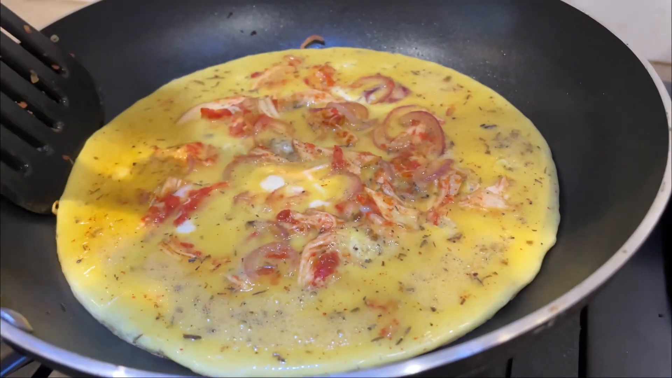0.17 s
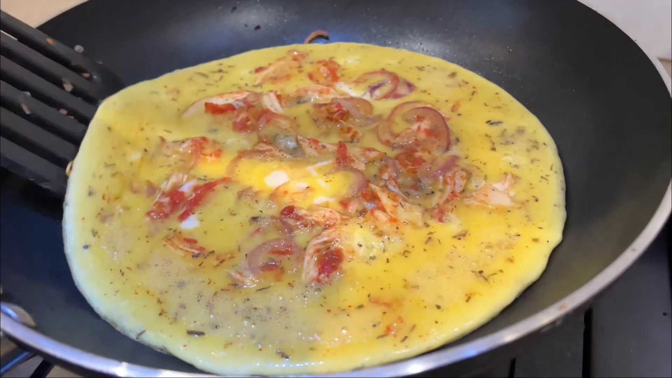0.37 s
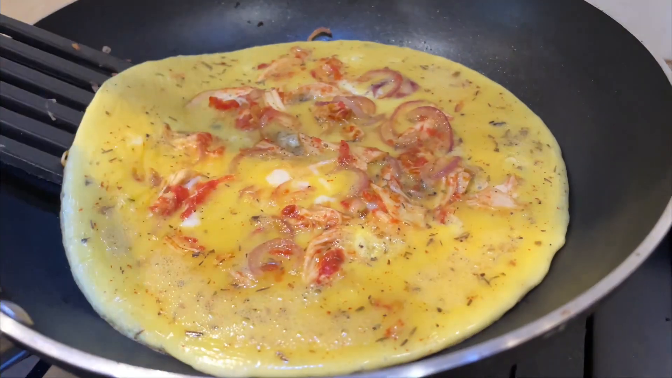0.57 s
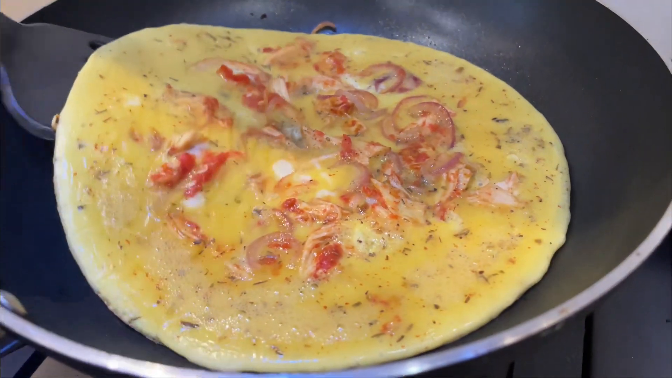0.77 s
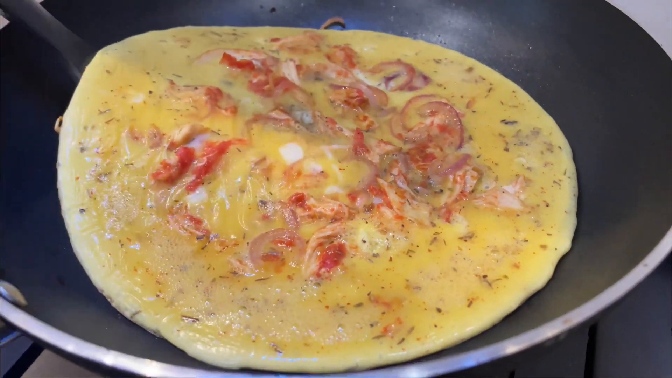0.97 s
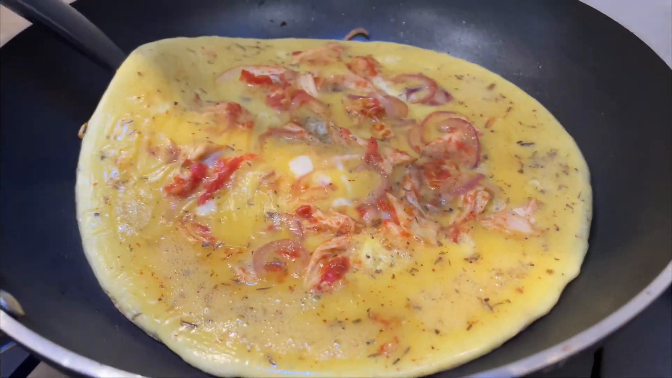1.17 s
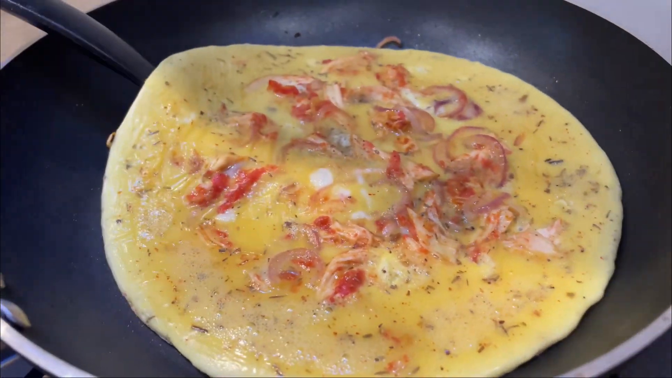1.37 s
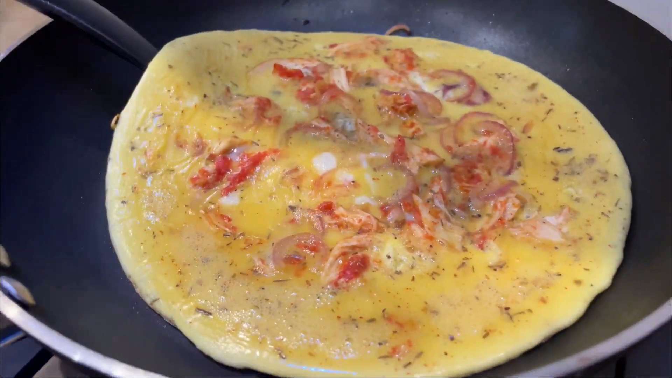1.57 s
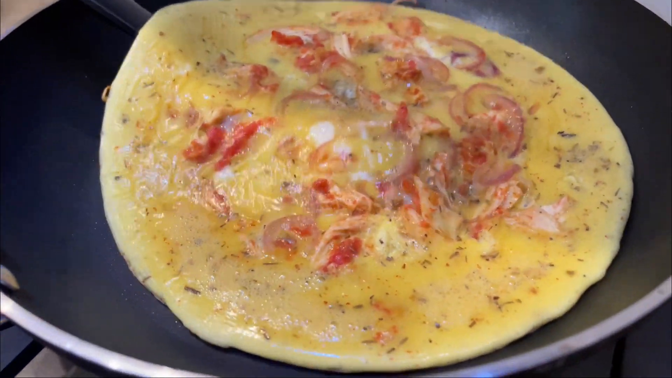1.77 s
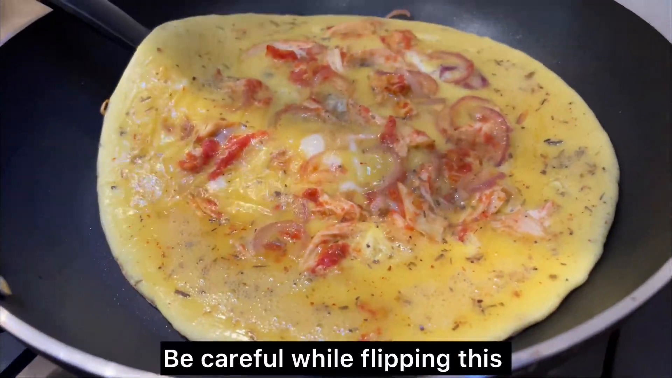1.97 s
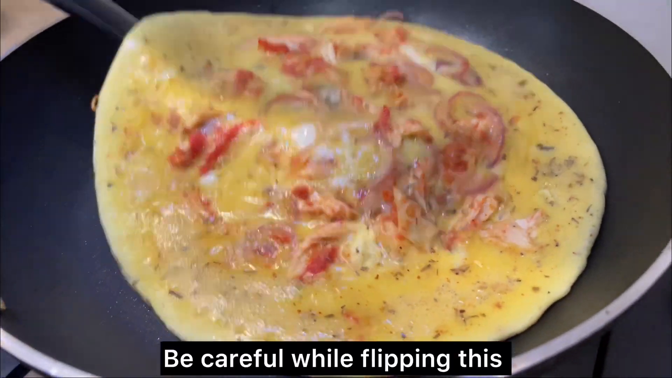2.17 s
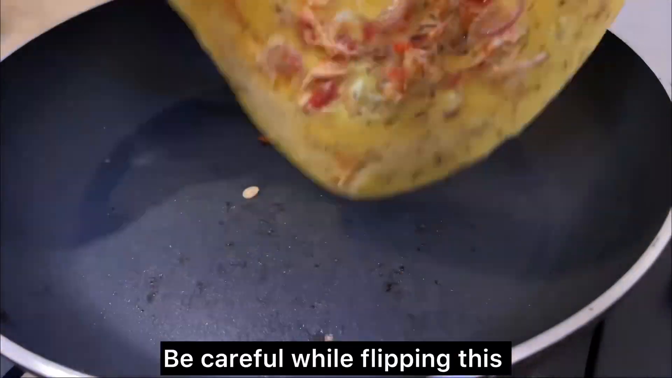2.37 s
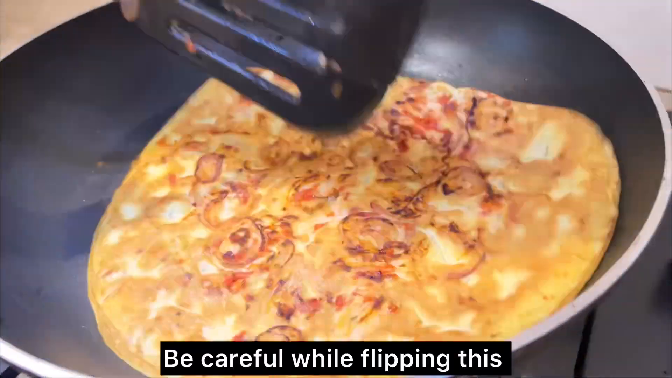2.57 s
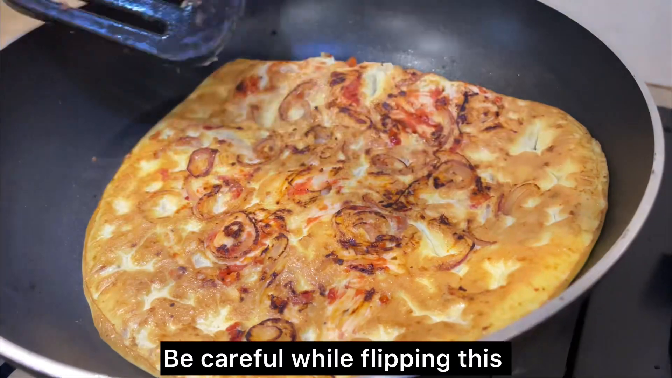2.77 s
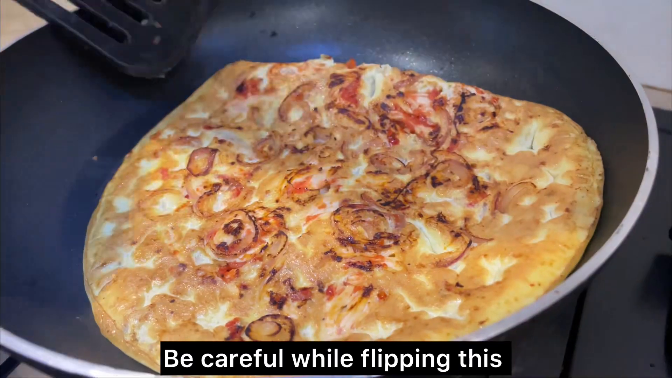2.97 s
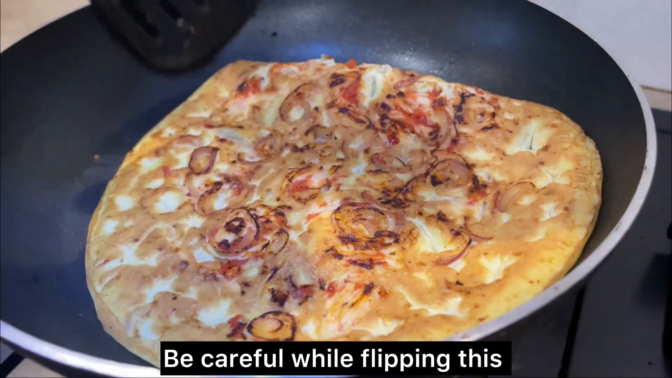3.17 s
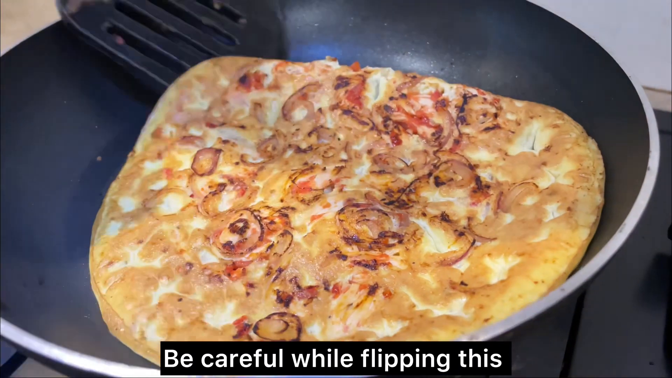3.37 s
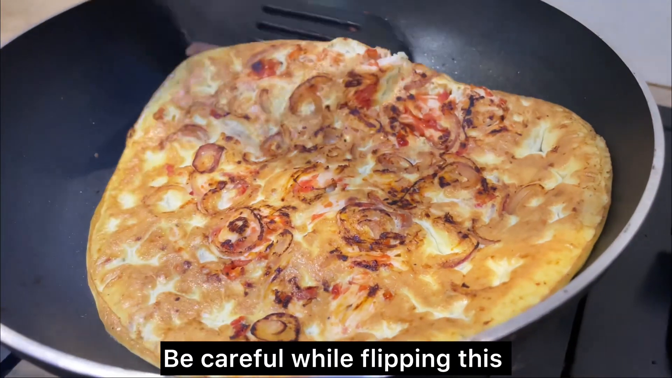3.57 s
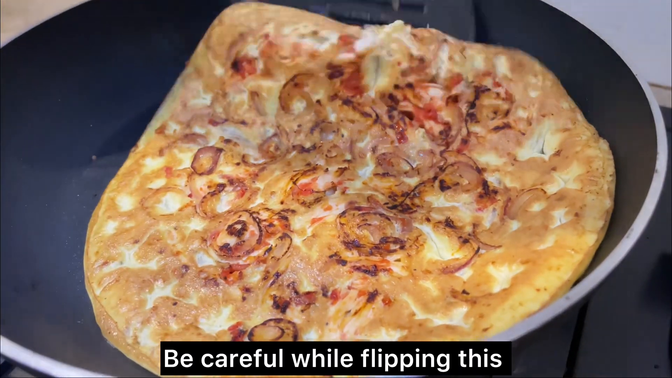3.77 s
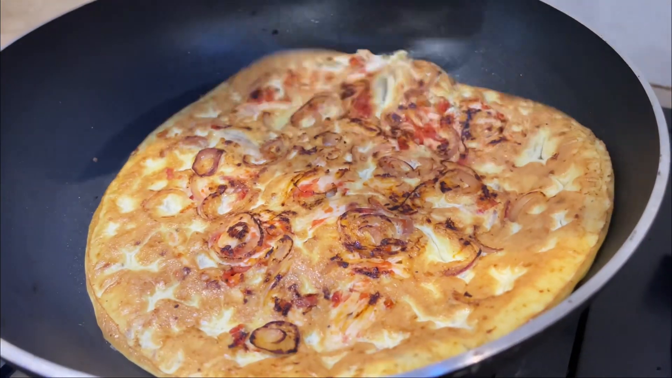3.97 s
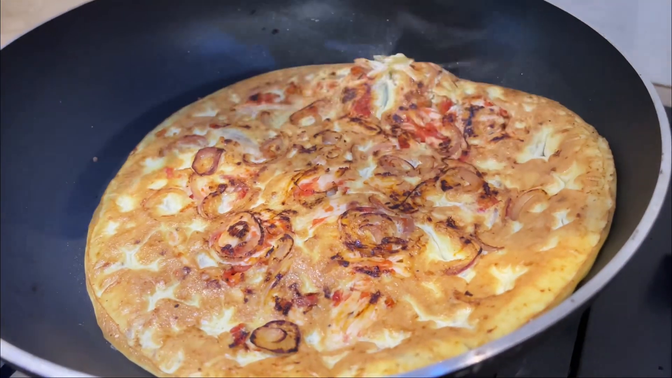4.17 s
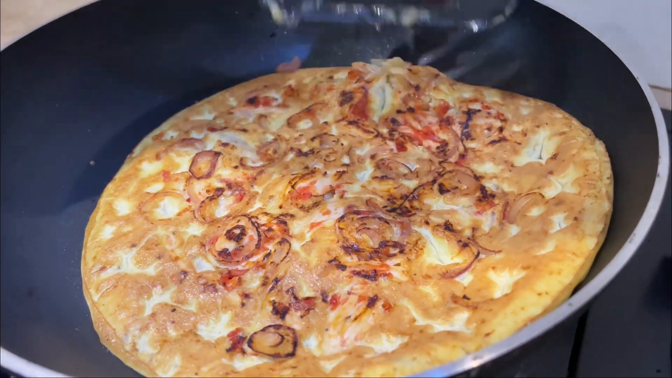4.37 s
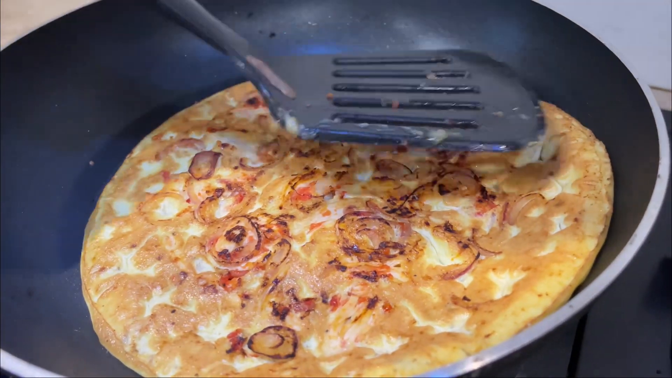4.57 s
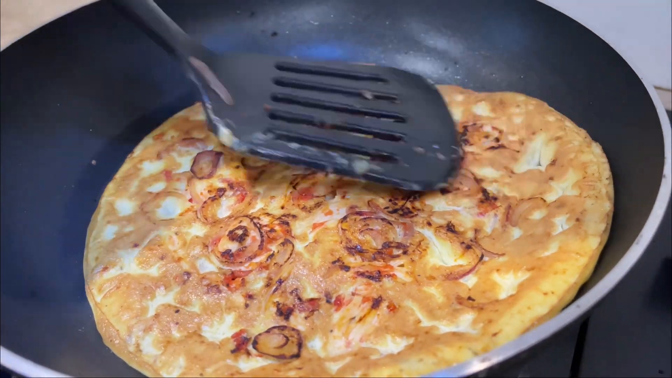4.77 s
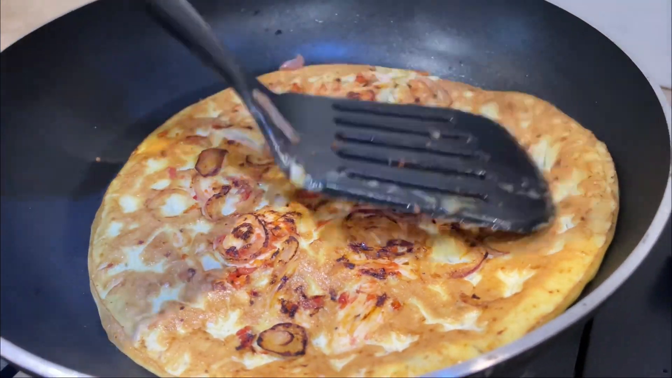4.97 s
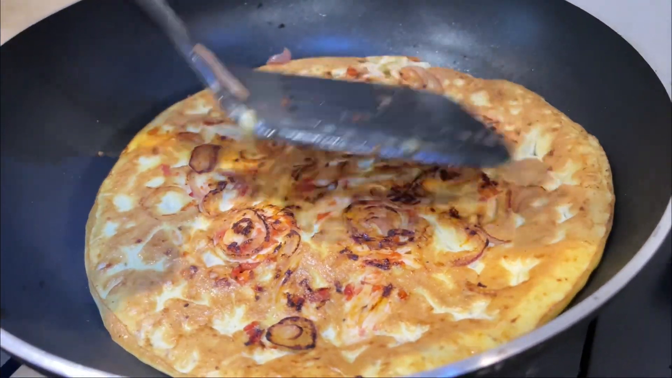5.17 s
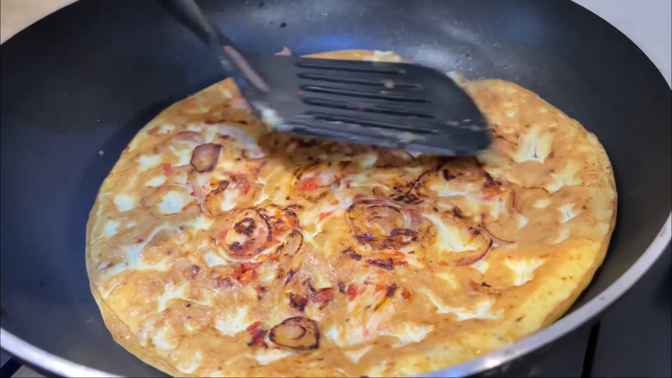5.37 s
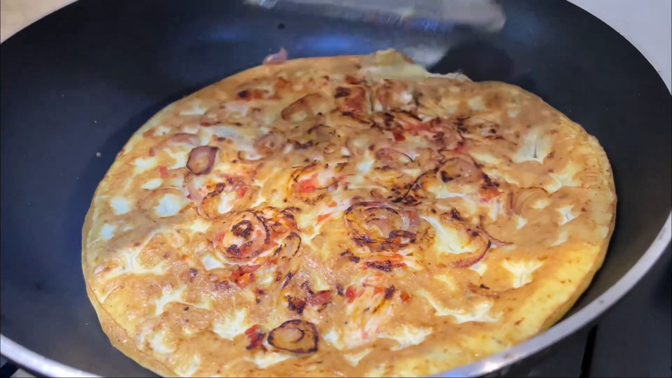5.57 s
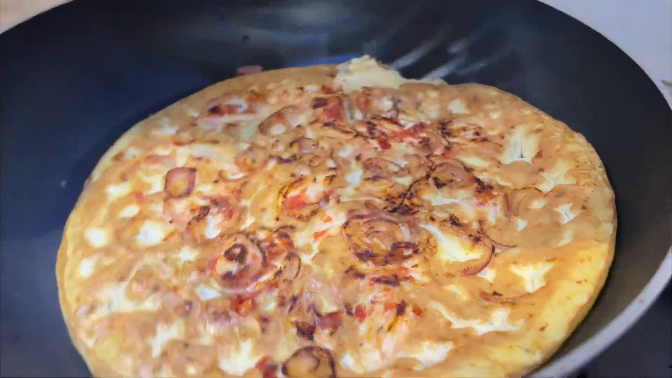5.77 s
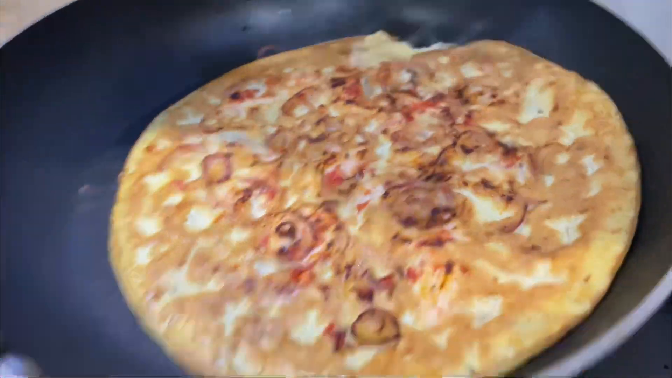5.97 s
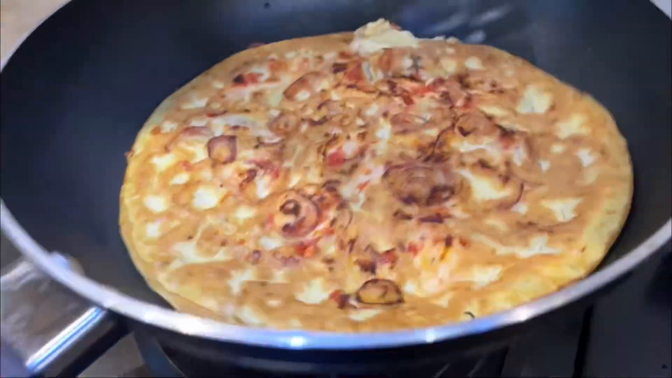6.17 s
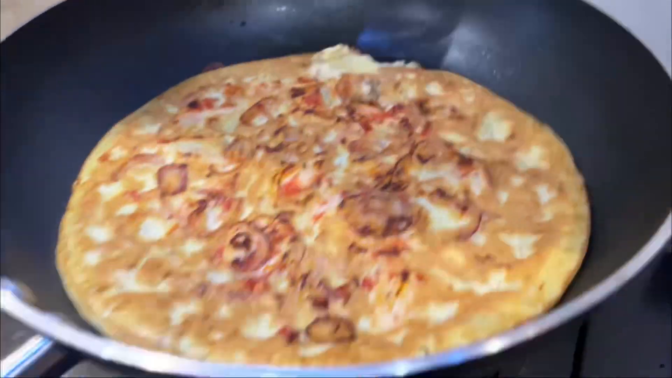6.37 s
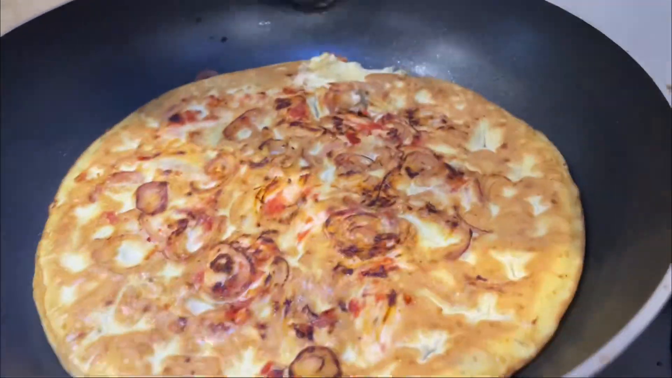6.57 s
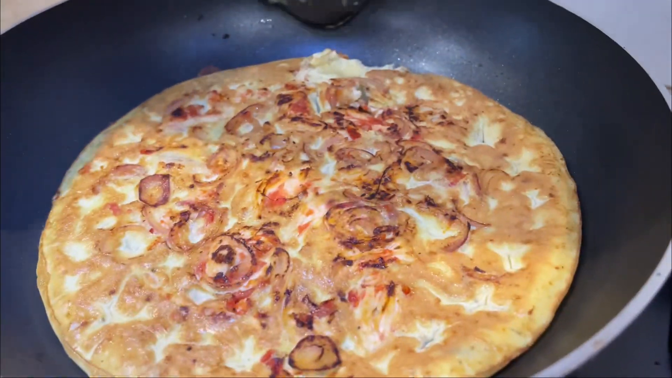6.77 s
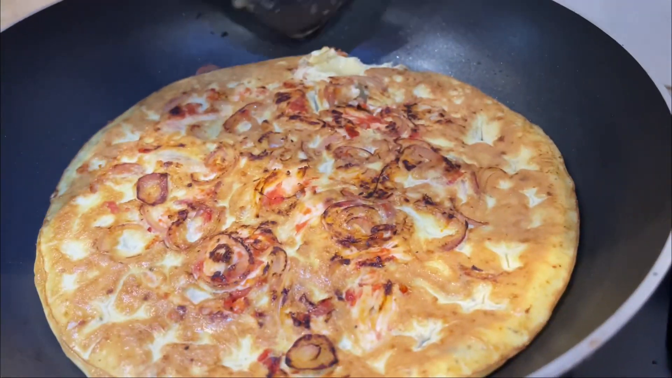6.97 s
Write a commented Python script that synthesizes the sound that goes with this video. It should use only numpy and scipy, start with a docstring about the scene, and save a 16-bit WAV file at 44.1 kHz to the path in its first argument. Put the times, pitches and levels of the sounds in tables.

```python
"""An omelette sizzles in a nonstick pan: countless random pops, filtered into dry hiss and wet bubbling.
It is lifted with a plastic spatula that rubs and ticks, flipped with a wet slap of noise and patted down.
The pan rings as it knocks on the iron grate; twice it is shaken across it, so that the hob top booms.
Fat spits in short bursts of noise and the gas burner rumbles as filtered noise, in a small kitchen.
A pair of microphone ports hears it all from close by."""
import sys
import numpy as np
from scipy import signal
from scipy.fft import rfft, irfft, next_fast_len
from scipy.io import wavfile

SR = 44100
rng = np.random.default_rng(int(sys.argv[2]) if len(sys.argv) > 2 else 0)


def output_pcm(signal):
    """Save a mono or channel-first signal as 16-bit PCM at the path in sys.argv[1].

    Samples are clipped to [-1, 1] before scaling.
    """
    pcm = np.clip(np.atleast_2d(signal).T, -1, 1) * 32767
    wavfile.write(sys.argv[1], SR, np.round(pcm).astype(np.int16))


N = 309582
SIZE = next_fast_len(N + SR // 2)  # room for filter tails
HZ = np.maximum(np.arange(SIZE // 2 + 1) * SR / SIZE, 1)
TIME = np.arange(N) / SR  # seconds
SEAR_RISE_S = 0.016

# Levels in all tables are relative: each source may trim them further.
# the pan knocks on the iron grate: start_s, clank_db, grate_rattle_db, hob_boom_db, brightness_hz
KNOCKS = [(2.579, -37, -32, -16, 2000), (5.8, -10, -12, -26, 1810), (5.823, -6, -15, -18, 1900),
          (5.833, -11, -19, -20, 2010), (5.871, -16, -11, -23, 1500), (5.9004, -5.5, -7.5, -33, 3030),
          (6.006, -22, -13, -33, 2600), (6.031, -38, -18, -40, 1500), (6.067, -23, -17.5, -48, 1500),
          (6.121, -24.5, -17.5, -49, 1500), (6.2436, 0.5, -4.5, -14.5, 3080),
          (6.259, -22, -14, -16.5, 3000), (6.297, -19, -16, -23, 1800), (6.320, -7.5, -13.5, -17, 2950),
          (6.346, -13, -32, -38, 2300), (6.374, -8, -8.5, -19, 3280), (6.45, -22, -17.5, -36, 3000),
          (6.4655, -4, -13, -22, 2400), (6.476, -8, -17, -36, 2200), (6.51, -24, -19, -29, 1500),
          (6.572, -13.5, -10.5, -29, 1200), (6.602, -18, -25, -30, 1200), (6.639, -32, -24, -35, 1200)]
# the plastic spatula knocks in the pan: start_s, tick_db, hollow_knock_db, hob_boom_db
TAPS = [(0.898, -32, -22.5, -40), (2.553, -5.5, -14, -36), (2.8241, -20.5, -17.5, -20.5),
        (2.911, -26, -22, -27.5), (2.973, -32, -18, -25.5), (3.069, -40, -25, -42),
        (3.1205, -11, -12.5, -27), (3.218, -9.5, -12.5, -30), (3.402, -20, -14, -31),
        (3.489, -20, -18, -37)]
# ringing of the spatula's blade: pitch_hz, width_hz, level_db
BLADE = [(352, 11.5, 3.5), (540, 61, 2), (755, 49, -3.5), (914, 33, -11.5), (1150, 270, -14),
         (1600, 180, -20), (1633, 14, -28), (2290, 43, -1.5)]
# egg pressed suddenly on hot metal: start_s, hiss_db, wet_bubbling_db
SEARS = [(2.569, -41, -29.5), (4.72, -47, -62), (6.246, -48, -24)]


def from_db(db):
    """Decibels to gain."""
    return 10 ** (np.asarray(db) / 20)


def rms_one(x):
    """Scale to unit power."""
    return x / np.sqrt(np.mean(x ** 2) + 1e-20)


def in_time(rows):
    """Each column of a curve at every sample."""
    s, *columns = np.transpose(rows)
    return [np.interp(TIME, s, column) for column in columns]


def over_hz(points):
    """A table joined by straight lines on a log-frequency axis."""
    hz, value = np.transpose(points)
    return np.interp(np.log(HZ), np.log(hz), value)


def colour(x, spectrum):
    """Filter to this spectrum without sounding ahead of time (minimum phase); white noise keeps its power."""
    gain = rms_one(from_db(over_hz(spectrum)))
    cepstrum = irfft(np.log(gain), SIZE)
    # folding the second half onto the first makes the filter act only forwards in time
    cepstrum[1:SIZE // 2] *= 2
    cepstrum[SIZE // 2 + 1:] = 0
    response = np.exp(rfft(cepstrum))
    return irfft(rfft(x, SIZE) * response, SIZE)[..., :N]


def cut(x, hz, kind, order):
    """Butterworth low- or high-pass filter."""
    sections = signal.butter(order, min(hz, SR / 2 - 100), kind, fs=SR, output="sos")
    return signal.sosfilt(sections, x + 1e-18)


def noise():
    """White noise: one row common to both ports, one row that differs between them."""
    return rng.standard_normal((2, N))


def drift(rate):
    """Slow random wandering: this many new random values a second, of spread 1, joined by lines."""
    return np.interp(TIME * rate, np.arange(2000), rng.standard_normal(2000))


def grains(per_s, spread_db):
    """Random clicks of unit power; positive spread makes a few much larger, negative a few much smaller."""
    born = rng.random(N) < per_s / SR
    sizes = from_db(spread_db * np.minimum(rng.exponential(1, N), 5))
    return rms_one(born * sizes * noise())


def resonate(x, modes, vary_db):
    """Parallel resonances of alternating sign, each fed with a level that wanders by vary_db."""
    out, power = 0, 0
    for k, (hz, width, db) in enumerate(modes):
        radius = np.exp(-np.pi * width / SR)  # a narrow width rings longer
        top = from_db(db) * (1 - radius * radius) / 2
        fed = x * from_db(vary_db * drift(20)) + 1e-18
        feedback = [1, -2 * radius * np.cos(2 * np.pi * hz / SR), radius * radius]
        out = out + (-1) ** k * signal.lfilter([top, 0, -top], feedback, fed)
        power += top * from_db(db)
    return out / np.sqrt(power)


def broad(x, hz, width_hz):
    """One wide, steady resonance."""
    return resonate(x, [(hz, width_hz, 0)], vary_db=0)


def fade(s, decay_s):
    """An envelope that starts at s and dies away."""
    return (TIME >= s) * np.exp(-np.clip((TIME - s) / decay_s, 0, 40))


def burst(s, rise_s, decay_s):
    """An envelope that builds from s while it also dies away."""
    return np.clip((TIME - s) / rise_s, 0, 1) * fade(s, decay_s)


def swell(s, half_s):
    """A smooth rise and fall around s."""
    return np.exp(-.5 * ((TIME - s) / half_s) ** 2)


def drag(s, length_s, attack_s=0.012, sag_db_per_s=14, release_s=0.04):
    """A push on the pan: it takes hold quickly, slackens as it goes on, and dies away after its length."""
    age = np.maximum(TIME - s, 0)
    release = np.exp(-np.clip((age - length_s) / release_s, 0, 40))
    return np.minimum(age / attack_s, 1) * from_db(-sag_db_per_s * age) * release


def sear(s, decay_s=0.049):
    """Sizzle builds as the egg is pressed down, then dies away."""
    return burst(s, SEAR_RISE_S, decay_s)


def swings(count=3, loss_db=6, half_s=0.02):
    """Strength of the omelette's swings to and fro after each shake, weaker each time."""
    # shakes of the pan: first_swing_s, swing_period_s, level_db
    shakes = [(5.883, 0.12, -33.5), (6.34, 0.135, -36.5)]
    strength = 0
    for s, period_s, db in shakes:
        for k in range(count):
            strength = strength + from_db(db - loss_db * k) * swell(s + k * period_s, half_s)
    return strength


def strikes(rows, chatter_s, chatter_growth, chatter_db, strike_db, order=6):
    """Force of knocks (start_s, level_db, brightness_hz): a strike, then a chatter, longer after hard ones."""
    force, chatter = np.zeros((2, N)), noise()
    for s, db, bright_hz in rows:
        span = slice(round(s * SR), round(s * SR) + SR // 10)
        settle_s = chatter_s * from_db(chatter_growth * db)
        contact = chatter[:, span] * from_db(chatter_db) * np.exp(-TIME[:SR // 10] / settle_s)
        contact[0, 0] += from_db(strike_db)  # the first touch reaches both ports alike
        force[:, span] += from_db(db) * cut(contact, bright_hz, "low", order=order)
    return force


def burner(roar_db=-42.0, ring_db=-43):
    """The gas flame rumbles steadily under the pan: shaped noise plus a few resonances."""
    # spectrum of the roar: pitch_hz, level_db (per Hz)
    roar_spectrum = [(25, -50), (47, -7.5), (62, -15), (97, -0.5), (114, -18.5), (132, -8), (170, -8),
                     (200, -9.5), (245, -16), (300, -7.5), (400, -29.5), (600, -14.5), (850, -21),
                     (1200, -26), (1700, -40.5), (4000, -55)]
    # resonances of the rumble: pitch_hz, width_hz, level_db
    rumble_modes = [(74.4, 6.5, -15), (96.7, 5.8, -3), (210, 23, -18.5), (296.2, 24, -11.5),
                    (479.4, 10.7, -18.5), (566, 35, -26.5)]
    roar = from_db(roar_db) * colour(noise(), roar_spectrum)
    ring = from_db(ring_db) * resonate(noise(), rumble_modes, vary_db=3.5)
    return roar + ring


def hob(rumble, push_s=0.0013, boom_db=0, rumble_db=-2, soft_hz=170, rumble_hz=300):
    """The pan's weight bears softly on the sheet-metal top, which booms."""
    # ringing of the hob top: pitch_hz, width_hz, level_db
    hob_modes = [(52, 14, -7), (68.5, 11, -1), (97, 10, 5), (125, 16, 0), (153.8, 14, -1),
                 (179.8, 12, -1.5), (215, 55, -9), (287, 22, -6), (354, 45, -12)]
    blows = [(s, db) for s, _, _, db in TAPS] + [(s, db) for s, _, _, db, _ in KNOCKS]
    pushes = sum(from_db(db + boom_db) * fade(s, push_s) for s, db in blows)
    soft_pushes = cut(pushes, soft_hz, "low", order=2)
    dragging = rumble * from_db(rumble_db) * cut(noise(), rumble_hz, "low", order=1)
    return resonate(soft_pushes + dragging, hob_modes, vary_db=3.5)


def grate(rumble, strike_db=14, strike_hz=1200, rattle_db=-2, rattle_s=0.018, drag_db=-15, judder_db=3,
          lag_s=0.0013, rise_s=0.007):
    """Each knock jolts the loose grate, which clatters on its feet; it judders as the pan slides over it."""
    # short, hollow ringing of the grate: pitch_hz, width_hz, level_db
    grate_modes = [(350, 50, -6), (480, 55, -1), (555, 60, -1), (612, 60, -1), (740, 60, -15)]
    jolts, rattle = np.zeros((2, N)), 0
    for s, _, db, _, _ in KNOCKS:
        jolts[:, round((s + lag_s) * SR)] += from_db(db + strike_db)
        rattle = rattle + from_db(db + rattle_db) * burst(s + lag_s, rise_s, rattle_s)
    dragged = rumble * from_db(drag_db + judder_db * drift(50))
    clatter = grains(per_s=1300, spread_db=-0.5) * np.hypot(rattle, dragged)
    return resonate(cut(jolts, strike_hz, "low", order=2) + clatter, grate_modes, vary_db=3.0)


def pan(scrape, crack_db=1.5, ring_db=1.5, scrape_db=0, scrape_hz=2600, slip_db=3, rasp_db=1,
        rasp_low_hz=2400, rasp_high_hz=5000, slide_damping=1.8):
    """The grate strikes the pan, which rings; sliding damps the ring and adds small slips and a dry rasp."""
    # ringing of the pan: pitch_hz, width_hz, level_db
    pan_modes = [(850, 90, -6), (975, 55, -1), (1170, 90, -6), (1305, 80, 1), (1431, 70, -2),
                 (1645, 40, -6), (1800, 40, -7), (2050, 80, 2), (2160, 65, 6), (2380, 150, -3),
                 (2940, 90, 0), (3100, 70, 3), (3360, 30, -3), (3590, 48, 4), (4230, 80, -7), (4710, 70, 2),
                 (5510, 90, -3), (6310, 70, 0), (6890, 50, 6)]
    clanks = [(s, db, hz) for s, db, _, _, hz in KNOCKS]
    force = strikes(clanks, chatter_s=0.0074, chatter_growth=0.19, chatter_db=-5.5, strike_db=17.0, order=4)
    slip_grains = cut(grains(per_s=1800, spread_db=0.0), scrape_hz, "low", order=2)
    slips = scrape * from_db(scrape_db + slip_db * drift(65)) * slip_grains
    rasp = cut(grains(per_s=900, spread_db=3.0), rasp_low_hz, "high", order=2)
    rasp = cut(rasp, rasp_high_hz, "low", order=4)
    sliding = slips + swings() * from_db(rasp_db) * rasp  # a rasp on each swing
    crack = cut(force + sliding, 680, "high", order=2)  # the contact itself, before the body rings
    damped = [(hz, width * slide_damping, db) for hz, width, db in pan_modes]
    ring = resonate(force, pan_modes, vary_db=4.5) + resonate(sliding, damped, vary_db=5.5)
    return from_db(ring_db) * ring + from_db(crack_db) * crack


def clicks(decay_s=0.0017, low_hz=1050, high_hz=2000):
    """The edge of the hard plastic blade ticks drily, too softly to ring the pan."""
    # light clicks: start_s, level_db
    edge_clicks = [(2.992, -19), (3.9948, -7), (4, -8.5), (4.599, -23), (4.6315, -17.5)]
    ticks = noise() * sum(from_db(db) * fade(s, decay_s) for s, db in edge_clicks)
    return cut(cut(ticks, low_hz, "high", order=3), high_hz, "low", order=4)


def taps(tick_hz=1350, tick_width_hz=500, top_hz=1950, flex_s=0.0045, flex_hz=1600):
    """The plastic edge ticks on the pan; a moment later the blade flexes with a lower, hollow knock."""
    ticks = [(s, db, top_hz) for s, db, _, _ in TAPS]
    knocks = [(s + flex_s, db, flex_hz) for s, _, db, _ in TAPS]
    touch = strikes(ticks, chatter_s=0.0037, chatter_growth=0.058, chatter_db=-8, strike_db=1)
    flex = strikes(knocks, chatter_s=0.0084, chatter_growth=0.075, chatter_db=-10.5, strike_db=12)
    return broad(touch, tick_hz, tick_width_hz) + resonate(flex, BLADE, vary_db=3.5)


def spatula(rub_hz=1300, rub_width_hz=450, rub_top_hz=2400, catch_db=0.0, blade_db=-2,
            judder_hz=490, judder_rise_s=0.004, overtone_db=-17):
    """The plastic blade catches and slips as it is pushed under the omelette, and judders briefly."""
    # the blade rubs along the pan: start_s, length_s, level_db
    rubs = [(0.62, 0.13, -51), (0.795, 0.046, -48.5), (3.422, 0.045, -43.5), (5.716, 0.043, -37)]
    # the blade judders: start_s, level_db, decay_s
    judders = [(0.898, -29.5, 0.033)]
    push = sum(from_db(db) * drag(s, length_s) for s, length_s, db in rubs)
    slip_grains = cut(grains(per_s=1900, spread_db=2.0), rub_top_hz, "low", order=2)
    slips = slip_grains * push * from_db(catch_db * drift(60))
    rub = broad(slips, rub_hz, rub_width_hz) + from_db(blade_db) * resonate(slips, BLADE, vary_db=-1.0)
    shake = sum(from_db(db) * burst(s, judder_rise_s, decay_s) for s, db, decay_s in judders)
    phase = 2 * np.pi * judder_hz * TIME + .5 * drift(30)
    tone = np.sin(phase) + from_db(overtone_db) * np.sin(2 * phase)
    return rub + shake * tone * [[1], [0]]  # the judder is common to both ports


def spits(level_db=-6, decay_s=0.0013, low_hz=3000, high_hz=11000):
    """Single droplets of fat burst with a sharp tick."""
    # spitting fat: start_s, level_db
    droplets = [(0.042, -26.5), (0.0654, -29), (0.0926, -30), (0.1195, -30), (0.4622, -15.5), (0.5522, -20),
                (1.137, -25), (1.3522, -21), (1.377, -13.5), (1.435, -22), (1.4783, -23.5), (1.63, -23),
                (1.733, -30.5), (1.908, -36), (2.448, -23.5), (2.474, -23), (2.518, -14), (2.9949, -22),
                (3.307, -27), (3.369, -23.5), (3.412, -28), (3.591, -19.5), (3.858, -24), (5.222, -23),
                (6.863, -25)]
    bursts = sum(from_db(db + level_db) * fade(s, decay_s) for s, db in droplets)
    return cut(cut(noise() * bursts, low_hz, "high", order=2), high_hz, "low", order=1)


def spatter(per_s=600, level_db=-6, decay_s=0.075, centre_hz=3100, width_hz=2000):
    """Egg pressed on hot fat throws off a shower of crackling droplets that outlasts the first sizzle."""
    shower = sum(from_db(db + level_db) * burst(s, SEAR_RISE_S, decay_s) for s, _, db in SEARS)
    return broad(grains(per_s, spread_db=-3.5) * shower, centre_hz, width_hz)


def slaps():
    """Soft egg meets hot metal patch by patch, squeezing out air and fat."""
    # soft wet contacts of omelette and spatula: start_s, level_db, decay_s
    contacts = [(0.468, -28, 0.0024), (0.5517, -27, 0.0031), (2.53, -28.5, 0.0046), (2.563, -12.5, 0.0052),
                (2.5675, -4, 0.0032), (2.572, -15.5, 0.0032), (4.718, -24.5, 0.0042), (4.7227, -31, 0.0076),
                (6.245, -16, 0.015)]
    # spectrum of a slap: pitch_hz, level_db (per Hz)
    slap_spectrum = [(150, -8), (500, -3.5), (1400, -1), (3500, 1), (5500, -3.5), (8000, -8), (11000, -15),
                     (16000, -21)]
    strength = sum(from_db(db) * fade(s, decay_s) for s, db, decay_s in contacts)
    return colour(noise() * strength, slap_spectrum)


def frying(hiss_db=-1.0, bubbling_db=6.5, crackle_db=-6, tick_db=-13, flare_db=2, wet_flare_db=1,
           flutter_db=2.5, surge_db=1.0):
    """Steam bursts through the fat in countless tiny pops; wetter ones sound lower, a few tick out alone."""
    # vigour of the frying: time_s, hiss_db, wet_bubbling_db
    vigour = [(0, -55.5, -62.5), (0.25, -56.5, -66), (0.4, -47, -59.5), (0.72, -48, -54.5),
              (0.98, -54, -62), (1.45, -49.5, -61.5), (1.8, -59, -65), (2.4, -57.5, -67),
              (2.47, -49, -53.5), (3.15, -51, -56.5), (3.5, -46.5, -51), (3.74, -50, -60.5),
              (4.02, -43.5, -52.5), (4.45, -49, -56.5), (5.3, -43, -52), (7.0, -47.5, -54)]
    # the fat flares up as the omelette is shifted or pressed: peak_s, level_db, half_length_s
    flare_ups = [(0.358, -52.5, 0.013), (1.268, -61, 0.011), (2.245, -58, 0.036), (3.321, -46.5, 0.01),
                 (4.766, -46.5, 0.044), (5.107, -44, 0.038), (5.428, -42, 0.038), (5.739, -45, 0.027),
                 (6.742, -50, 0.0093), (6.928, -60, 0.0088)]
    # spectra of hiss and bubbling: pitch_hz, level_db (per Hz)
    hiss_spectrum = [(1000, -34.5), (2500, 9), (4000, 12.5), (5500, 10.5), (9000, 10), (11000, 5.5),
                     (13000, 0), (16000, -2.5)]
    wet_spectrum = [(300, 5), (700, -20), (1300, 5.5), (1750, -1), (2200, 5), (3300, -1.5), (4500, -11),
                    (8000, -33)]
    hiss_level, wet_level = in_time(vigour)
    flares = swings() + sum(from_db(db) * swell(s, half_s) for s, db, half_s in flare_ups)
    hiss_sear = sum(from_db(db) * sear(s) for s, db, _ in SEARS)
    wet_sear = sum(from_db(db) * sear(s) for s, _, db in SEARS)
    pops = grains(per_s=13000, spread_db=-2.0) + from_db(crackle_db) * grains(per_s=600, spread_db=-0.5)
    ticks = from_db(hiss_level + tick_db) * grains(per_s=60, spread_db=1.5)
    hiss_gain = from_db(hiss_level + hiss_db) + from_db(flare_db) * flares + hiss_sear
    wet_gain = from_db(wet_level + bubbling_db) + from_db(wet_flare_db) * flares + wet_sear
    hiss = colour(pops * hiss_gain + ticks, hiss_spectrum)
    wet = colour(grains(per_s=2500, spread_db=-2.0), wet_spectrum) * wet_gain
    return (hiss + wet) * from_db(flutter_db * drift(45) + surge_db * drift(14))


def kitchen(x, wet_db=-14, wall_hz=6000, t60_s=0.076):
    """Dense, dull reflections from nearby walls, different at each port; they fall 60 dB in t60_s."""
    tail = cut(noise() * fade(0.0078, t60_s / np.log(1000)), wall_hz, "low", order=1)
    tail /= np.sqrt(np.sum(tail ** 2, axis=1, keepdims=True))
    reflections = irfft(rfft(x, SIZE) * rfft(tail, SIZE), SIZE)[:, :N]
    return x + from_db(wet_db) * reflections


def ports(x):
    """The two ports agree in the bass, part in the middle, and hear the treble a little later on the right."""
    # left-right agreement: pitch_hz, likeness (0-1)
    likeness = [(100, .99), (260, 0.96), (380, 0.82), (550, 0.28), (1100, 0.27), (2150, 0.3), (2450, 0.48),
                (3000, 0), (4500, 0), (5100, 1)]
    # lag of the right side: pitch_hz, lag_radians
    port_lag = [(300, 0), (2250, 1.1), (2700, 4.1), (4000, 5.8), (5000, 6.2), (7600, 9.4), (11000, 12.6),
                (14000, 15.6), (16000, 16.8)]
    # level balance: pitch_hz, left_minus_right_db
    tilt = [(80, -1), (250, -0.9), (520, -3), (1000, -0.5), (2100, 0), (4000, 0)]
    common, apart = rfft(x, SIZE)
    alike = np.clip(over_hz(likeness), -.9, 1)
    common = common * np.sqrt((1 + alike) / 2)
    apart = 1j * apart * np.sqrt((1 - alike) / 2)
    lag = np.exp(-1j * np.interp(HZ, *np.transpose(port_lag)))
    lean = from_db(over_hz(tilt) / 2)
    left = (common + apart) * lean
    right = (common - apart) * lag / lean
    return irfft(np.array([left, right]), SIZE)[:, :N]


def scene():
    """Frying, handling and flame, all within arm's length."""
    # the pan is dragged or rocked over the grate: start_s, length_s, rumble_db, scrape_db
    slides = [(0.909, 0.052, -30, -77), (2.569, 0.11, -23.5, -58), (2.824, 0.52, -26, -73),
              (3.412, 0.12, -23.5, -68), (4.04, 0.077, -35.5, -57), (5.725, 0.11, -23.5, -39),
              (5.826, 0.076, -13, -25), (5.916, 0.22, -18.5, -37), (6.247, 0.096, -14, -31),
              (6.372, 0.23, -19, -39)]
    rumble = sum(from_db(db) * drag(s, length_s) for s, length_s, db, _ in slides)
    scrape = sum(from_db(db) * drag(s, length_s) for s, length_s, _, db in slides)
    handling = kitchen(pan(scrape) + taps() + spatula() + clicks() + slaps() + spatter() + spits())
    return ports(frying() + handling + grate(rumble) + hob(rumble) + burner())


def record(dry, cutoff_hz=15700):
    """Peaks beyond full scale clip and the top of the treble is cut."""
    low_pass = signal.ellip(10, .1, 70, cutoff_hz, fs=SR, output="sos")
    return signal.sosfilt(low_pass, np.clip(dry, -1, 1))


dry = scene()
out = record(dry)
output_pcm(out)
```